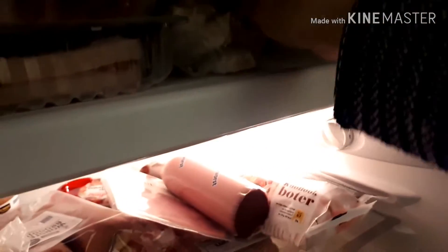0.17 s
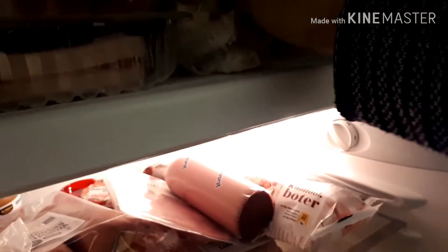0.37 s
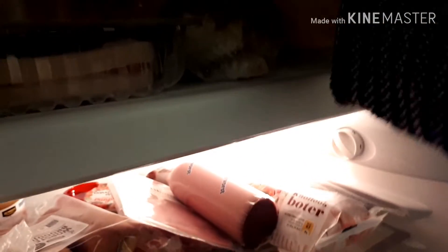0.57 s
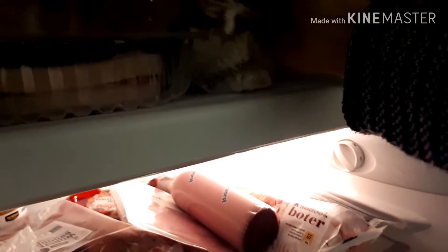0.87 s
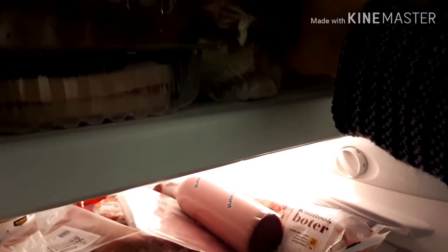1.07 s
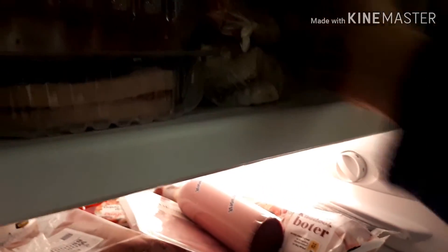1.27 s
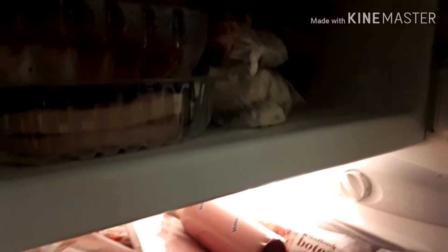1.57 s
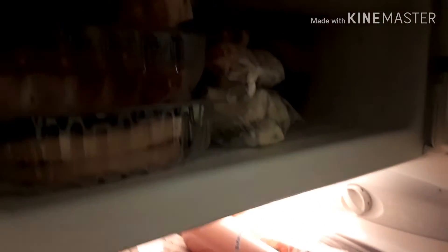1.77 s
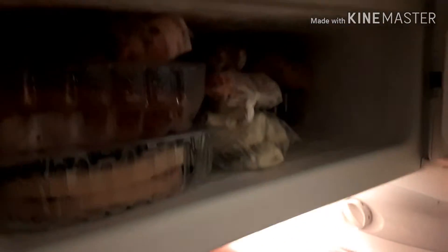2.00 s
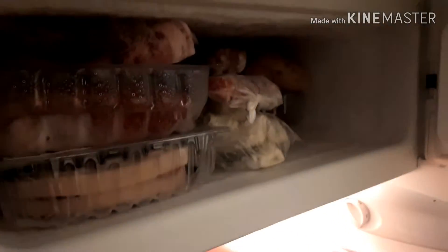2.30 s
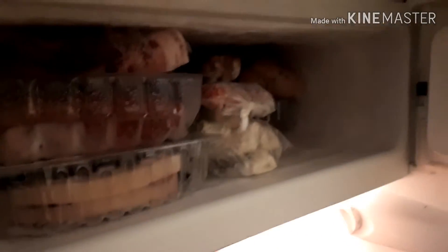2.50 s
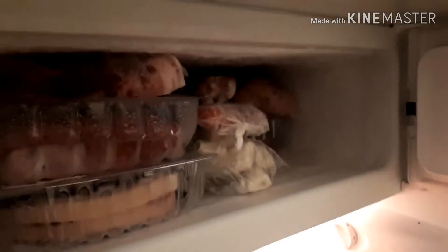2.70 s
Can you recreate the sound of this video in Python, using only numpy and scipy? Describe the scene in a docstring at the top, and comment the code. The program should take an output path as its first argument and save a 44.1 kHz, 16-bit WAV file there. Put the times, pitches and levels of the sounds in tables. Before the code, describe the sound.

Frozen wrapped packages are shifted on a hollow freezer shelf, heard close. A heavy knock at 0.05 s comes with a faint squeaky slide; hard taps, sharp plastic cracks and scraping burst at 0.3-0.45 s, then rustling and small bumps fade by 1.2 s. A stiff tray snaps at 1.5 s with a short ring-on. A bag swishes near 1.95 s, then quiet dragging and rustling continue from 2.1 s over soft hiss and intermittent hum.

```python
"""A pack slides with a faint squeak amid rustling wrap, while frozen packs knock, tap, drag and scuff on a
hollow freezer shelf and their plastic wrap cracks, over room hiss and a cabinet hum that comes and goes.
A stiff tray snaps back in the pause, a bag swishes, and a quieter second spell of handling follows.
Friction is shaped noise or random grains, the shelf is resonators and decaying sines, the tray is
a set of struck modes, and dying noise bands give the reverberant tail of cracks and snaps."""
import sys
import numpy as np
from scipy import signal
from scipy.fft import rfft, irfft
from scipy.io import wavfile

SR = 44100
rng = np.random.default_rng(int(sys.argv[2]) if len(sys.argv) > 2 else 0)


def waveform_to_disk(signal):
    """Save audio, clipped to [-1, 1], as 16-bit WAV at the path in sys.argv[1]."""
    frames = np.transpose(np.atleast_2d(signal))
    scaled = np.clip(frames, -1, 1) * 32767
    samples = np.round(scaled).astype(np.int16)
    wavfile.write(sys.argv[1], SR, samples)


N = 125685
T = np.arange(N) / SR


def amp(db):
    """Decibel definition: amplitude ratio is ten to the power dB / 20."""
    return 10 ** (np.asarray(db, float) / 20)


def unit(x):
    """Normalisation of mean power: scale to an rms of 1."""
    return x / np.sqrt(np.mean(x ** 2) + 1e-20)


def noise():
    """White noise: two independent signals with equal mean power at every frequency."""
    return rng.standard_normal((2, N))


def filtered(x, order, edge_hz, kind="low"):
    """Butterworth filtering: a maximally flat passband."""
    return signal.sosfilt(signal.butter(order, edge_hz, kind, fs=SR, output="sos"), x)


def level(spells):
    """Amplitude envelope: gain moves linearly in dB through each spell, near silence between spells."""
    silent_db, fade_s = -95, .012
    gain = 0
    for rows in spells:
        s, db = np.transpose(rows)
        times = np.r_[s[0] - fade_s, s, s[-1] + fade_s]
        gain = gain + amp(np.interp(T, times, np.r_[silent_db, db, silent_db]))
    return gain


def at_hz(points, hz):
    """Spectral interpolation: values run linearly along log frequency."""
    points = np.array(points)
    return np.interp(np.log(hz), np.log(points[:, 0]), points[:, 1])


def widen(mid_side):
    """Interaural coherence: unrelated signals become left and right, alike in bass, unlike in treble."""
    # Each row: frequency in Hz, left-right correlation.
    likeness = [(40, .9), (100, 0.97), (300, 0.95), (600, 0.61), (1200, 0.071), (4000, 0.11),
                (12000, 0.062)]
    mid, side = rfft(mid_side)
    alike = np.clip(at_hz(likeness, np.arange(len(mid)) * SR / N + 1), -1, 1)
    left_right = np.sqrt(1 + alike) * mid + np.sqrt(1 - alike) * side * [[1], [-1]]
    return irfft(left_right, N) / np.sqrt(2)


def coloured(x, spectrum):
    """Spectral shaping: weight each frequency, steep outside the end points; widened, rms 1."""
    hz = np.arange(N // 2 + 1) * SR / N + 1
    edge = np.clip(np.minimum(hz / spectrum[0][0], spectrum[-1][0] / hz), 0, 1) ** 4
    return unit(widen(irfft(rfft(x) * amp(at_hz(spectrum, hz)) * edge, N)))


def grains(per_s, spread_db):
    """Stick-slip friction: tiny slips of uneven size at random instants."""
    born = rng.random((2, N)) < per_s / SR
    size_db = spread_db * np.minimum(rng.exponential(1, (2, N)), 5)
    return born * noise() * amp(size_db)


def resonate(x, hz, width_hz):
    """Damped resonance: a two-pole resonator whose bandwidth sets its decay."""
    r = np.exp(-np.pi * width_hz / SR)
    zeros = [(1 - r * r) / 2, 0, (r * r - 1) / 2]
    return signal.lfilter(zeros, [1, -2 * r * np.cos(2 * np.pi * hz / SR), r * r], x)


def ping(s, hz, t60, attack_s):
    """Free vibration of one mode: a sine swells smoothly, then decays exponentially."""
    out, start = np.zeros(N), int(s * SR)
    t = T[:min(N - start, int((t60 + attack_s) * SR))]
    swell = np.sin(np.pi / 2 * np.minimum(t / attack_s, 1)) ** 2
    decay = amp(-60 * np.maximum(t - attack_s, 0) / t60)
    out[start:start + len(t)] = np.sin(2 * np.pi * hz * t) * swell * decay
    return out


def burst(s, length_s):
    """Impulsive release: instant start, exponential decay with the time constant length_s."""
    return (T >= s) * np.exp(-np.maximum(T - s, 0) / length_s)


def ticks(per_s, low_hz, high_hz, cycles):
    """Impulse excitation: random slips ring short resonances, each at one of ten pitches."""
    hits = grains(per_s, 0.96) + 1e-18  # the tiny offset keeps the filters from stalling
    dealt = rng.integers(0, 10, N)
    pitches = enumerate(np.geomspace(low_hz, high_hz, 10))
    return unit(widen(sum(resonate(hits * (dealt == k), hz, hz / cycles) for k, hz in pitches)))


def slides():
    """Frictional vibration over frost: a narrow gliding squeak, a steep band and a lower resonance."""
    # Each row: start and end in seconds, level in dB, squeak pitch at start and end in Hz,
    # squeak width in Hz, level of the band around it and of the lower resonance in dB against the squeak.
    glides = [(-.05, .29, -38.5, 1880, 1800, 80, -1, -1), (1.403, 1.49, -57, 1660, 1690, 50, -4, -23),
              (.69, .727, -45.5, 1110, 1200, 60, -12, -25)]
    low_hz = 860
    out = 0
    for start, end, db, hz0, hz1, width_hz, band_db, low_db in glides:
        x, parts = noise(), rng.standard_normal((2, 2, N))
        # slow complex noise carried up to the squeak pitch makes a narrow band
        waver = filtered(parts[0] + 1j * parts[1], 2, width_hz / 2)
        phase = 2 * np.pi * np.cumsum(np.interp(T, [start, end], [hz0, hz1])) / SR
        tone = unit((waver * np.exp(1j * phase)).real)
        band = unit(filtered(x, 6, [hz1 * .8, hz1 * 1.29], "band"))
        low = unit(resonate(resonate(x, low_hz, 170), low_hz, 320))
        rub = unit(widen(tone + amp(band_db) * band + amp(low_db) * low))
        gate = np.clip(np.minimum(T - start, end - T) / .003, 0, 1)
        out = out + amp(db) * rub * gate
    return out


def rustle():
    """Dense stick-slip of wrap on wrap: countless coloured grains, with sparser ringing crinkles."""
    # Two spells of handling. Each row: time in seconds, level in dB.
    rustle_levels = [
        [(0, -46), (.04, -47.5), (.05, -30), (.09, -33.5), (.105, -41.5), (.18, -49), (.285, -45),
         (.299, -21.5), (.33, -32.5), (.36, -38.5), (.41, -33), (.43, -40), (.487, -44), (.51, -40),
         (.665, -43), (.71, -46.5), (.8, -51), (.85, -40.5), (.87, -47), (.985, -56.5), (1.0, -52),
         (1.137, -58), (1.19, -96)],
        [(2.06, -57), (2.1, -48), (2.154, -45.5), (2.172, -42), (2.29, -45.5), (2.342, -47), (2.396, -43),
         (2.522, -55.5), (2.548, -46), (2.65, -42), (2.774, -50.5), (2.85, -43)],
    ]
    # Each row: frequency in Hz, relative spectral level in dB.
    rustle_colour = [(530, -32), (900, -12.5), (1400, -14), (2000, -10), (3700, -12.5), (5500, -12.5),
                     (7940, -10.5), (9610, -15.5), (12200, -13), (15700, -12)]
    fine = coloured(grains(11000, 1.2), rustle_colour)
    crinkles = ticks(800, 2000, 12000, cycles=7.4)
    return level(rustle_levels) * (fine + amp(-11) * crinkles)


def hiss_and_hum():
    """Stationary noise and narrow-band filtering: steady room hiss and a cabinet hum of varying level."""
    # Each row: frequency in Hz, relative spectral level of the hiss in dB.
    hiss_colour = [(28, -24.5), (60, -5), (120, -2.5), (280, -14), (565, -16.5), (1400, -22.5),
                   (4500, -28.5), (15700, -30.5)]
    # Level of the hum. Each row: time in seconds, level in dB.
    hum_levels = [
        [(0.0, -71), (0.05, -38), (0.25, -66), (0.3, -46), (1.23, -68), (2.37, -61), (2.41, -46.5), (2.56, -61),
         (2.75, -49.5), (2.85, -68)],
    ]
    hum_hz, width_hz, hiss_db = 86, 18, -67.5
    hiss = amp(hiss_db) * coloured(noise(), hiss_colour)
    hum = resonate(resonate(noise(), hum_hz, width_hz), hum_hz, 2 * width_hz)
    return hiss + level(hum_levels) * unit(widen(hum))


def taps():
    """Impact of hard frozen corners: two short partials and a puff of noise, partials later on the right."""
    # Each row: start in seconds, level in dB, pitch in Hz before a small random detuning.
    corners = [(0.045, -11.5, 956), (0.046, -14, 1117), (0.294, -23, 1910), (0.308, -16.5, 935),
               (0.363, -10, 992), (0.528, -31.5, 960), (0.536, -28.5, 1200), (0.559, -29, 1174),
               (0.579, -25.5, 1710), (0.592, -31, 1280), (0.658, -29.5, 1034), (0.743, -39, 830),
               (1.096, -36, 1080), (1.11, -34, 860), (2.629, -47, 800)]
    t60_s, lag_s = .028, .0002
    over, over_db = 1.7, -10.5  # pitch ratio and level of the upper partial
    puff_db, puff_s = -8, .004
    puff = unit(widen(filtered(noise(), 2, [700, 2100], "band")))
    out = 0
    for (s, db, hz), detune in zip(corners, rng.normal(1, 0.04, (len(corners), 2))):
        sides = []
        for at, ratio in zip((s, s + lag_s), detune):
            main = ping(at, hz * ratio, t60_s, 0.0011)
            upper = ping(at, hz * over * ratio, t60_s / 2, 0.0013)
            sides.append(main + amp(over_db) * upper)
        out = out + amp(db) * (np.array(sides) + amp(puff_db) * puff * burst(s, puff_s))
    return out


def cracks():
    """Sudden release of strain in wrap: short sprays of grains, each with its own ring and brightness."""
    # Each row: start in seconds, level in dB, decay constant in seconds, ring pitch in Hz,
    # relative level in dB of the spray's treble.
    crack_rows = [(0.045, -16, 0.0024, 1860, -5.5), (0.081, -24, 0.0044, 5000, -6),
                  (0.2968, -11.5, 0.0029, 1830, -13), (0.302, -17.5, 0.003, 4500, -4),
                  (0.305, -13, .003, 2870, -3), (0.312, -14, 0.0044, 1870, -5),
                  (0.335, -21.5, 0.0045, 4820, -2), (0.339, -23.5, 0.0039, 3580, -6),
                  (0.347, -26, .003, 4300, -6.5), (0.365, -20, 0.0017, 1960, -7),
                  (0.416, -20, 0.0045, 2650, 6), (0.658, -27.5, 0.007, 3700, -5),
                  (0.676, -30.5, 0.004, 3900, -16), (0.999, -41, 0.0024, 1523, -1.5),
                  (1.136, -47, 0.0036, 2950, 3)]
    split_hz = 6340
    ring_db, ring_cycles, left_over_right_db = 5.5, 4.6, 3.5
    spray = filtered(widen(grains(8200, 2.6)), 2, 1200, "high")
    low = unit(filtered(spray, 2, split_hz))
    top = unit(filtered(spray, 2, split_hz, "high"))
    out = 0
    for s, db, length_s, hz, top_db in crack_rows:
        gate = amp(db) / 2 * burst(s, length_s)
        ring = resonate(gate * low + 1e-18, hz, hz / ring_cycles)
        out = out + gate * (low / 2 + amp(top_db) * top) + amp(ring_db) * ring
    return out * amp(left_over_right_db * np.array([[.5], [-.5]]))


def kitchen(x):
    """Diffuse reverberation by convolution: tray and kitchen ring on as noise dying band by band."""
    # Each row: centre in Hz, width in Hz, t60 in seconds, level in dB.
    tail_bands = [(1560, 550, .4, -33), (520, 150, .35, -43), (2470, 180, 0.35, -25),
                  (3400, 320, 0.36, -26.5), (3180, 3300, 0.29, -31), (6300, 2200, 0.35, -29.5),
                  (8490, 2500, 0.16, -34), (11550, 2100, 0.3, -36.5)]
    t, tail = np.arange(SR // 2) / SR, 0
    for hz, width_hz, t60, db in tail_bands:
        band = filtered(rng.standard_normal((2, len(t))), 2, [hz - width_hz / 2, hz + width_hz / 2], "band")
        tail = tail + amp(db - 60 * t / t60) * band
    return signal.fftconvolve(x, tail * np.minimum(t / .006, 1), axes=1)[:, :N]


def knocks():
    """Modal response of the hollow shelf: each knock or press swells one low mode and an overtone."""
    # Each row: start in seconds, level in dB, pitch in Hz, t60 in seconds, swell in seconds.
    presses = [(0.052, -3.5, 259.2, 0.079, 0.0096), (0.294, -13, 240, 0.022, 0.0037),
               (.422, -14.5, 236.5, 0.077, 0.0053), (.745, -29.5, 235, 0.025, 0.011),
               (0.84, -28.5, 269.3, 0.1, 0.0058), (1.013, -25.5, 249.4, 0.043, 0.0094),
               (1.098, -34, 297.6, 0.11, 0.005), (2.184, -35.5, 290, 0.12, 0.018),
               (2.189, -31, 192, 0.11, 0.005), (2.397, -28, 177, 0.06, 0.02),
               (2.277, -45, 302, 0.16, 0.043), (2.351, -35.5, 430.6, 0.073, 0.036),
               (2.55, -38.5, 295, 0.098, 0.018), (0.055, -15.5, 153.3, 0.11, 0.0082),
               (.42, -24, 160, 0.089, 0.0144), (2.631, -38.5, 168.6, 0.2, 0.011)]
    over, over_db = 2.12, -14.5  # pitch ratio and level of the overtone
    out = 0
    for s, db, hz, t60, swell_s in presses:
        overtone = ping(s, hz * over, t60, swell_s)
        out = out + amp(db) * (ping(s, hz, t60, swell_s) + amp(over_db) * overtone)
    return out


def drag():
    """Forced vibration: rough dragging drives shelf resonances, weighted differently after the pause."""
    # Each row: time in seconds, level in dB.
    drag_levels = [
        [(0.085, -17.5), (0.107, -26.5), (0.125, -28), (0.139, -31.5), (0.225, -37.5), (0.265, -38.5),
         (0.29, -28)],
        [(0.297, -15.5), (0.305, -15), (0.355, -29), (0.371, -21.5), (0.399, -28.5), (0.425, -26.5),
         (0.513, -45), (0.597, -40.5), (0.729, -51), (0.751, -42), (0.819, -48), (0.845, -30.5), (0.903, -45.5),
         (0.947, -37.5), (0.979, -52), (1.021, -29), (1.039, -39.5), (1.107, -39), (1.32, -84.5)],
        [(2.114, -69), (2.166, -54.5), (2.186, -34), (2.202, -33), (2.252, -50.5), (2.298, -43), (2.418, -36),
         (2.45, -44), (2.53, -62.5), (2.562, -41.5), (2.592, -43.5), (2.664, -35.5), (2.734, -45), (2.758, -52),
         (2.85, -65)],
    ]
    # Each row: pitch in Hz, width in Hz of the first of two resonators (the second is twice as wide),
    # relative level in dB before the pause and after it.
    shelf = [(123, 20, -11, -11.5), (160, 16, -5, 1), (213, 50, -15.5, 1), (250.6, 45, 1, -10.5),
             (295, 31, -11, 4), (377, 26, -11, -5.5), (429.7, 44, -12.5, 2), (526.5, 100, -8.5, -17)]
    switch_s = 1.5  # within the pause
    before, after = 0, 0
    for hz, width_hz, before_db, after_db in shelf:
        ring = resonate(resonate(noise(), hz, width_hz), hz, 2 * width_hz) / np.sqrt(width_hz)
        before = before + amp(before_db) * ring
        after = after + amp(after_db) * ring
    return level(drag_levels) * np.where(T < switch_s, unit(widen(before)), unit(widen(after)))


def scuff():
    """Intermittent friction on frost: coloured grains in the middle range, with ringing ticks."""
    # Each row: time in seconds, level in dB.
    scuff_levels = [
        [(0.297, -21.5), (0.317, -21), (0.33, -29), (0.36, -27), (0.363, -22.5), (0.395, -36), (0.417, -23),
         (0.445, -47), (0.587, -41.5), (0.627, -51.5), (0.665, -39.5), (0.803, -63), (0.845, -42.5),
         (0.951, -65.5), (1.105, -48), (1.25, -82.5)],
        [(2.1, -76), (2.18, -57), (2.242, -67), (2.326, -54.5), (2.402, -45.5), (2.42, -50.5), (2.526, -71.5),
         (2.608, -56), (2.634, -38), (2.704, -46), (2.85, -71)],
    ]
    # Each row: frequency in Hz, relative spectral level in dB.
    scuff_colour = [(210, -16), (350, -4), (437, 1), (735, -3.5), (801, 0), (1240, -2.5), (1480, -9.5),
                    (1800, -7.5), (3500, -28), (4550, -46)]
    rub = coloured(grains(3000, 2.3), scuff_colour)
    return level(scuff_levels) * (rub + amp(-10) * ticks(230, 800, 2100, cycles=7.4))


def snap():
    """Modal excitation: short jolts set the tray's modes ringing; returns the tray and the bare jolt."""
    # Each row: start in seconds, level in dB, tilt in dB per octave about the second mode.
    jolts = [(1.4923, -21, 6), (1.4972, -17.5, 0), (1.4995, -24, -14), (1.530, -39.5, 3.5)]
    # Each row: mode pitch in Hz, relative level in dB, t60 in seconds.
    modes = [(2230, 3, 0.0042), (3410, 12.5, 0.008), (4460, 8.5, 0.0034), (6240, 13, 0.0037),
             (7780, 3, 0.002), (9450, 0, .004), (11700, -4.5, 0.0024), (13300, -10.5, .003)]
    jolt_s = 0.0015
    hiss, tray = widen(noise()), 0
    for k, (hz, mode_db, t60) in enumerate(modes):
        octaves = np.log2(hz / modes[1][0])
        push = hiss * sum(amp(db + tilt * octaves) * burst(s, jolt_s) for s, db, tilt in jolts) + 1e-18
        ring = resonate(push, hz, np.log(1000) / np.pi / t60)
        tray = tray + amp(mode_db) * (-1) ** k * 2 * ring  # neighbouring modes have opposite sign
    return tray, hiss * sum(amp(db) * burst(s, jolt_s) for s, db, tilt in jolts)


def thuds():
    """Damped soft contact: light dull touches in the pause are brief bursts of low noise."""
    # Each row: start in seconds, level in dB before halving.
    touches = [(1.496, -44.5), (1.566, -37.5), (1.874, -61.5)]
    dull = unit(filtered(rng.standard_normal(N), 2, [90, 685], "band"))
    return dull * sum(amp(db) * burst(s, .0029) for s, db in touches) / 2


def swish():
    """Broadband sliding friction: one bag swishes out before the second spell, as coloured noise."""
    # Each row: time in seconds, level in dB.
    swish_levels = [
        [(1.88, -75.5), (1.914, -49), (1.962, -40.5), (2.032, -46.5), (2.052, -42), (2.085, -49.5), (2.13, -55)],
    ]
    # Each row: frequency in Hz, relative spectral level in dB.
    swish_colour = [(300, -14), (411, -5.5), (675, -6.5), (1150, -23), (1420, -14.5), (2260, -10.5),
                    (3540, -9), (3910, -1.5), (4390, -10.5), (5530, -4), (8370, -11.5), (12700, -12.5),
                    (15700, -20.5)]
    return level(swish_levels) * coloured(noise(), swish_colour)


def scene():
    """Superposition: near sources lean slightly left, over the reverberant tail, hiss and hum."""
    left_db, crack_tail_db = 0.34, -12
    crack, (tray, jolt) = cracks(), snap()
    near = slides() + rustle() + taps() + crack + knocks() + drag() + scuff() + tray + thuds() + swish()
    tail = kitchen(jolt + amp(crack_tail_db) * crack)
    return near * amp([[left_db], [-left_db]]) + tail + hiss_and_hum()


def record(dry):
    """Band limiting and saturation: the deepest bass is lost, peaks are rounded, the top is cut."""
    bass_cut_hz, cutoff_hz, top = 68, 16050, .95
    dry = filtered(dry, 2, bass_cut_hz, "high")
    rounded = top * np.tanh(dry / top)
    return signal.sosfilt(signal.cheby2(14, 70, cutoff_hz, fs=SR, output="sos"), rounded)


dry = scene()
out = record(dry)
waveform_to_disk(out)
```